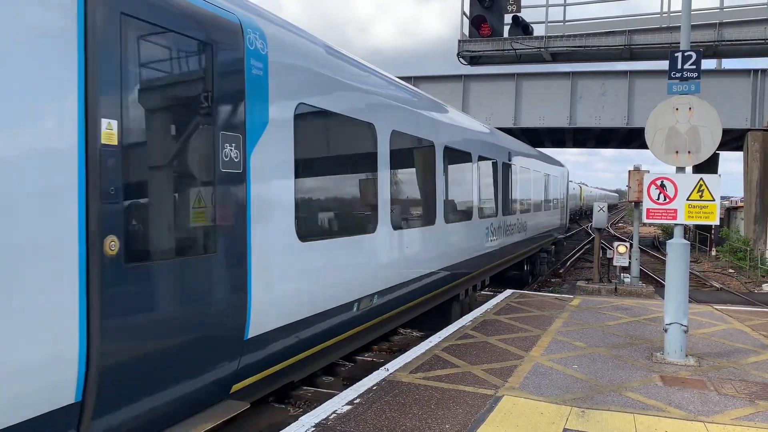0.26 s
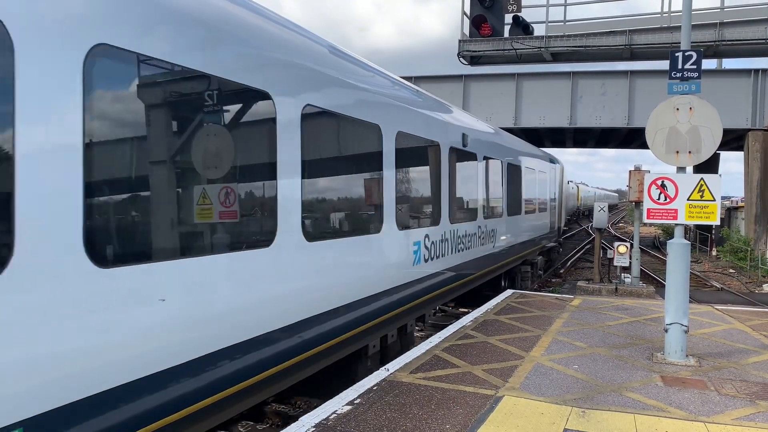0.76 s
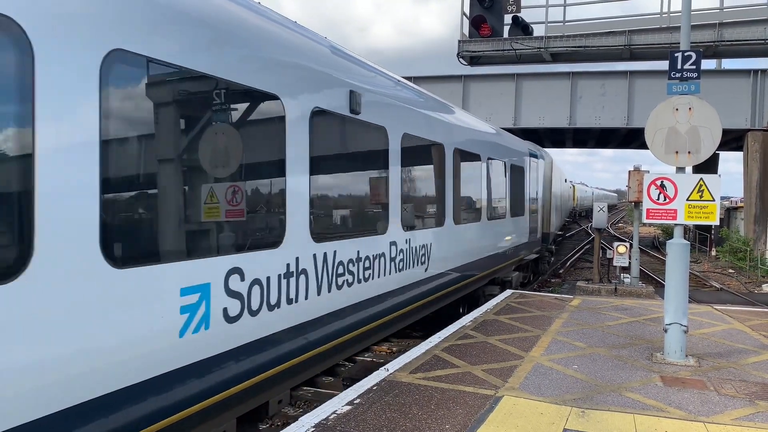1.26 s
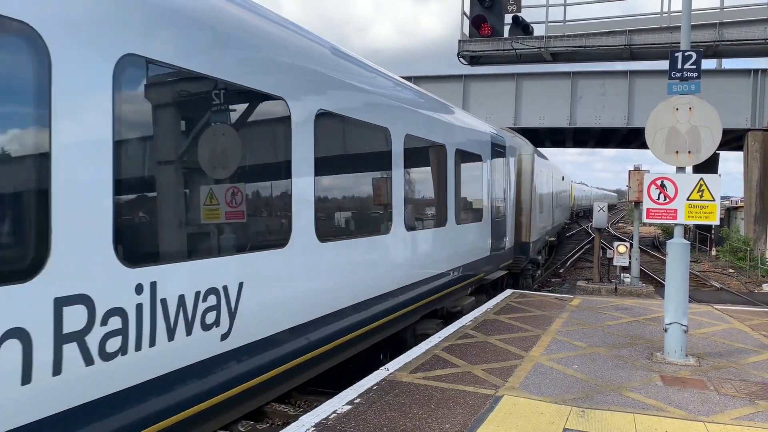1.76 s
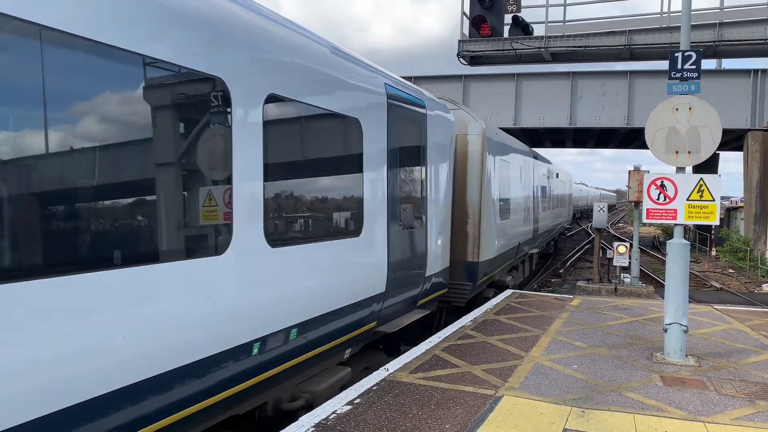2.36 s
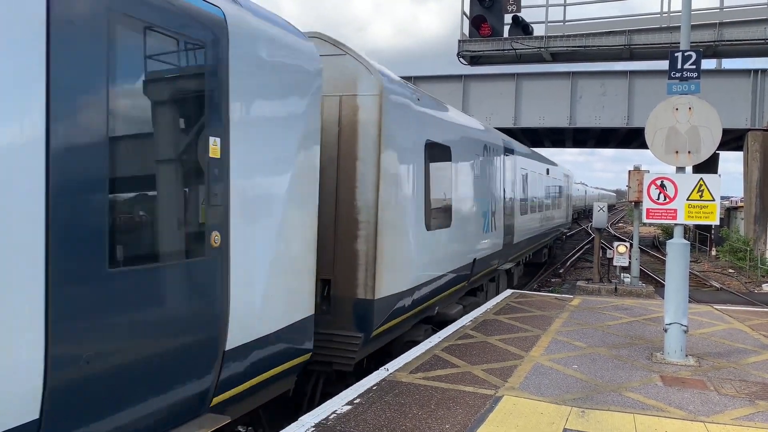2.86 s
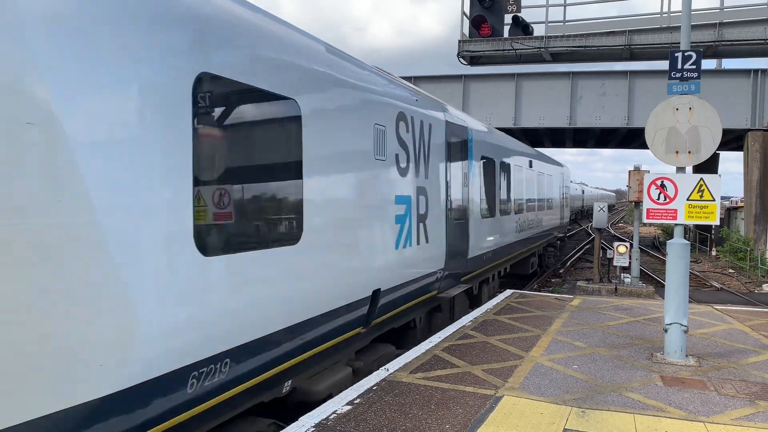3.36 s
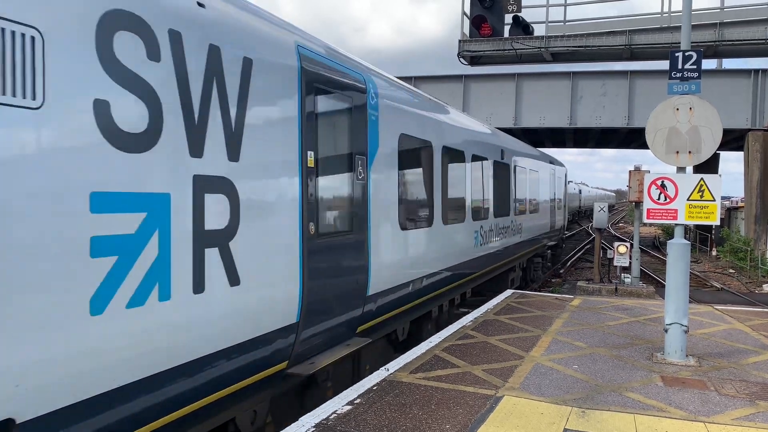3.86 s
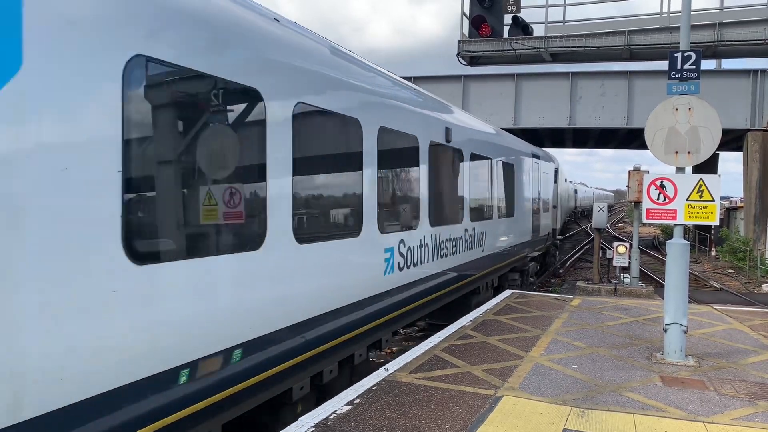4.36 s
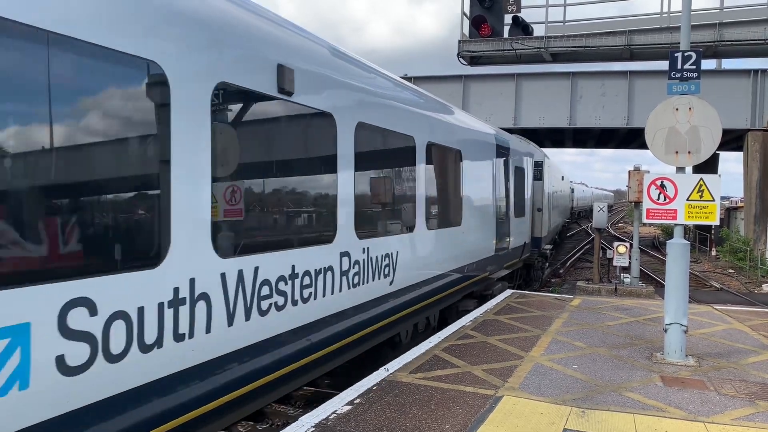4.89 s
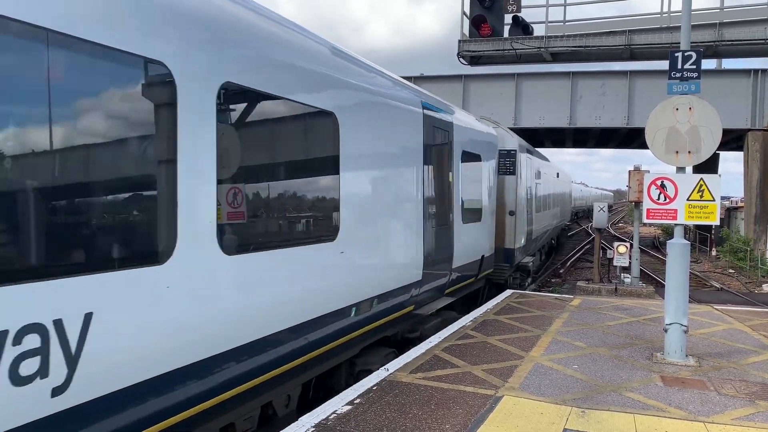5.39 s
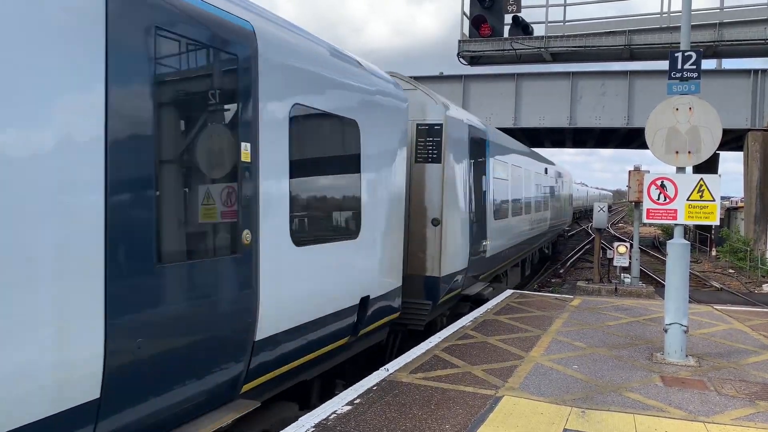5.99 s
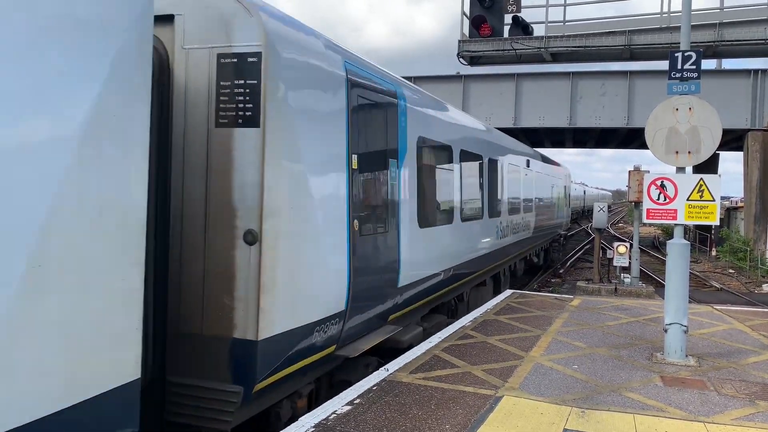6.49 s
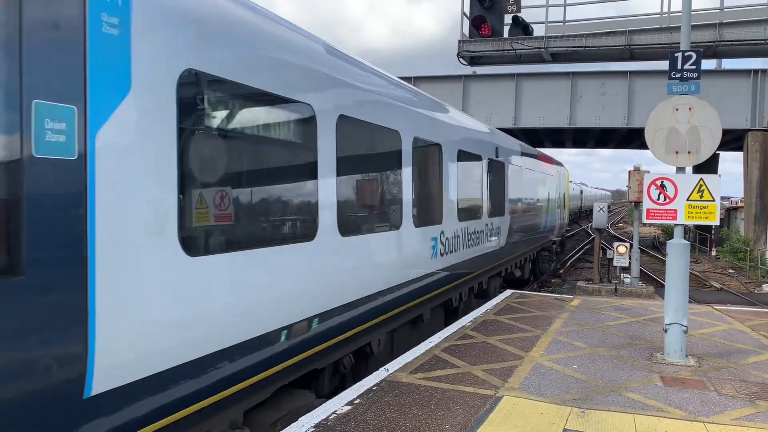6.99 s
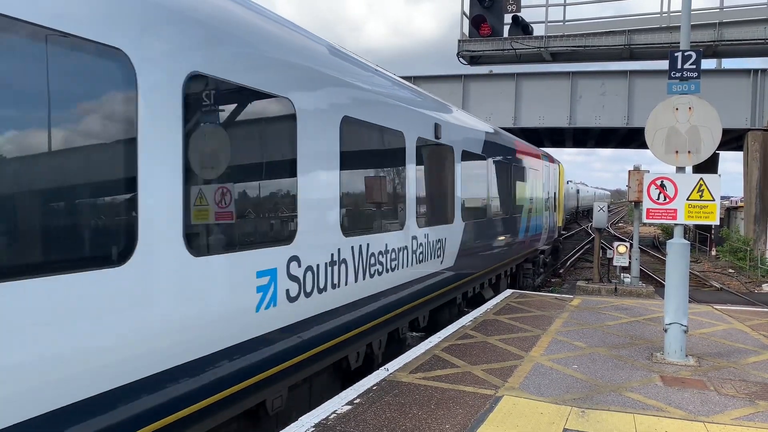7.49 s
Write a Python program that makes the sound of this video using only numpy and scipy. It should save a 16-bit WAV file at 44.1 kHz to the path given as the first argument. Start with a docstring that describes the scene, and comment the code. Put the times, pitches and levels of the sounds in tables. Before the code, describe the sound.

An electric train is already rolling past a platform, close to a stereo microphone outdoors. Low uneven rumble, hollow body drone and soft rail noise run throughout. From 0 to 1.2 s, dull muffled knocks from farther joints come irregularly, with light hiss and a thin squeak near 0.75. Heavy wheel blows on the near joint land at 1.36, 1.73, 2.39 and 2.78 s: a short thick crack, low thud, then a bright broken clank and brief ring. From 3 to 4.6 s mostly rumble remains, with airy hiss swelling around 3.9. A dull knock at 4.7 leads into blows at 4.75, 5.13, 5.79 and 6.17 s, with a small mid-pitched squeak around 5.3. From about 6 s, a wavering low electric hum and midrange roar rise with the approaching motor car, rail noise and hiss growing until the abrupt end at 7.7 s.

```python
"""Beside a railway platform, an electric train rolls along. Eight wheels in turn strike a rail joint close by:
the blow runs along the rail, its upper middle first, then the treble, the bass last; joint and wheel clank
and ring, built from noise bursts and struck tones. Shaped noise makes the rolling rumble, the hiss from the
underframe and the roar of a motor car, whose hum swells as it comes near. Metal squeaks, and dull knocks come
from joints further off. Two microphone ports a hand apart listen."""
import sys
import numpy as np
from scipy import signal
from scipy.fft import rfft, irfft, next_fast_len
from scipy.io import wavfile
from scipy.ndimage import uniform_filter1d, map_coordinates

SR = 44100
rng = np.random.default_rng(int(sys.argv[2]) if len(sys.argv) > 2 else 0)


def to_wav(sig):
    """Store sig (one row per channel, or 1-D mono) as 16-bit WAV at the path in sys.argv[1].

    Samples outside -1..1 are clipped; the rate is SR.
    """
    pcm = np.clip(np.atleast_2d(sig), -1, 1) * 32767
    pcm = np.round(pcm).astype(np.int16)
    wavfile.write(sys.argv[1], SR, pcm.T)  # frames by channels


N = 341334
T = np.arange(N) / SR  # time of every sample (s)


def amp(db):
    """Gain of a level in dB."""
    return 10 ** (np.asarray(db) / 20)


def unit(x):
    """x scaled to rms 1."""
    return x / np.sqrt(np.mean(x ** 2) + 1e-20)


def along(points, hz):
    """Every column after the first, read on a log-frequency axis."""
    f, *cols = np.transpose(points)
    return np.squeeze([np.interp(np.log(hz + 1), np.log(f + 1), c) for c in cols])


def curves(rows):
    """One value per sample for each column after the time."""
    s, *cols = np.transpose(rows)
    return [np.interp(T, s, c) for c in cols]


def wobble(rate):
    """A smooth random curve with rate random points a second."""
    points = rng.standard_normal(int(N * rate / SR) + 4)
    return map_coordinates(points, [T * rate])


def filtered(x, response):
    """x times a complex response of frequency."""
    m = next_fast_len(N + SR // 4)
    spectrum = rfft(x, m) * response(np.fft.rfftfreq(m, 1 / SR))
    return irfft(spectrum, m)[..., :N]


def smooth_noise(shape, bins, frames):
    """Random values averaged over neighbouring frequency bins and time frames."""
    across_bins = uniform_filter1d(rng.standard_normal(shape), size=bins, axis=0)
    return uniform_filter1d(across_bins, size=frames, axis=1)


def rush(spectrum, patchy_db):
    """Two unrelated noises of rms 1 with the same patches of random gain."""
    z = signal.stft(rng.standard_normal((2, N)), nperseg=512)[2]
    patches = unit(smooth_noise(z.shape[1:], bins=5, frames=10))
    pair = signal.istft(z * amp(patchy_db * patches), nperseg=512)[1][:, :N]
    return unit(filtered(pair, lambda hz: amp(along(spectrum, hz))))


def narrow(centre_hz, width_hz):
    """Two noises of rms 1 through one resonance applied twice."""
    peak = lambda f: 1 / (1 + ((f - centre_hz) / width_hz * 2) ** 2)
    return unit(filtered(rng.standard_normal((2, N)), peak))


def burst(bands, bend=1, uneven_db=3, grain_db=0):
    """Two noises whose bands arrive, swell and die in their own time; peak near 1. Bend over 1 holds, then drops."""
    noise = rng.standard_normal((2, SR // 2))
    hz, t, z = signal.stft(noise, SR, nperseg=256, noverlap=224)
    db, arrival, rise, t60 = along(bands, hz)[:, :, None]
    age = np.maximum(t - arrival, 0)
    uneven = unit(smooth_noise(z.shape[1:], bins=1, frames=60))  # no two blows alike
    rattle = unit(smooth_noise(z.shape[1:], bins=40, frames=4))  # many small impacts
    decay_db = -60 * (age / t60) ** bend
    swell = (1 - np.exp(-age / rise)) ** 1.5
    gain = amp(db + decay_db + uneven_db * uneven + grain_db * rattle) * swell
    pair = signal.istft(z * gain, SR, nperseg=256, noverlap=224)[1]
    loudest = np.sqrt(uniform_filter1d(pair[0] ** 2, size=SR // 25).max())
    return pair / (2.5 * loudest)


def ring(hz, t60):
    """One struck mode; its phase wanders and its strength flutters, so it sounds broken, not glassy."""
    t = np.arange(SR // 2) / SR
    wander = np.cumsum(rng.normal(0, 0.1, (2, len(t))), axis=1)
    flutter_db = 4 * map_coordinates(rng.standard_normal(60), [t * 70])
    fade = amp(flutter_db - 60 * t / t60) * (1 - np.exp(-t / 0.012))
    return fade * np.sin(2 * np.pi * hz * t + wander)


def add(track, s, sound):
    """Adds sound to track from second s on."""
    part = track[:, round(s * SR):][:, :sound.shape[1]]
    part += sound[:, :part.shape[1]]


def passing(at_s, distance_m):
    """Gain of a point on the train that is abreast at at_s; 1 at that moment."""
    speed = 23 / 3.397  # m/s: one car length per car time
    return 1 / np.hypot(1, speed * (T - at_s) / distance_m)


# how much the two ports hear the same: f/Hz, likeness (0-1)
PORT_LIKENESS = [(60, 0.73), (130, 0.94), (250, 0.91), (600, 0.45), (1500, 0.77), (2600, 0.21),
                 (4000, 0.11), (6500, 0.07), (8300, 1), (16000, 0.9)]
TREBLE_LAG = 8 / SR  # s


def ports(pair, lag, alike=PORT_LIKENESS):
    """Mixes a direct and a diffuse signal onto two ports; the left hears lag seconds after the right."""
    turn = lambda hz: np.arccos(np.clip(along(alike, hz), 0, 1)) / 2
    mid, side = filtered(pair, lambda hz: np.array([np.cos(turn(hz)), np.sin(turn(hz))]))
    delay = lambda hz: np.exp(np.outer([-1j, 1j], np.pi * hz * lag))
    return filtered(np.array([mid + side, mid - side]), delay)


# bands of the crack in the rail: f/Hz, level/dB, arrival t/s, rise t/s, fall by 60 dB t/s
CRACK_BANDS = [(149, -8, 0.011, 0.0099, .13), (300, 2.5, 0.013, .014, 0.13),
               (428, 0, 0.0039, 0.0094, 0.086), (660, -6.5, 0.0011, 0.014, 0.17),
               (1150, -13, 0.00083, 0.012, 0.14), (1590, -16, .001, 0.013, 0.17),
               (2130, -14.5, 0.00028, 0.011, 0.16), (3100, -26.5, 0.006, .016, 0.17),
               (5050, -33, 0.0062, 0.011, .2), (7660, -41, 0.0056, 0.0053, 0.066)]


def rail_crack(bite_db):
    """The rail's bending wave: a noise burst, upper middle first, treble a little later, bass last."""
    # the bite shifts the level above 1400 Hz
    bands = [(hz, db + bite_db * (hz > 1400), *times) for hz, db, *times in CRACK_BANDS]
    return burst(bands, bend=1.54, uneven_db=2.0, grain_db=2.5)


def landing():
    """The wheel landing on the far rail head: one sharp low push, ringing for two cycles; peak near 1."""
    pitch_hz, t60 = 287, 0.0093
    t = np.arange(SR // 20) / SR
    fade = amp(-60 * t / t60) * (1 - np.exp(-t / 0.00049))
    wave = -fade * np.sin(2 * np.pi * pitch_hz * t)
    return np.array([wave, .2 * wave])


def thud(hz):
    """A few cycles of the sleepers' bounce, sinking in pitch towards hz; peak near 1."""
    t = np.arange(SR // 5) / SR
    sinking_time = t + 0.0044 * (1 - np.exp(-t / 0.0047))
    wave = -t / 0.0073 * np.exp(1 - t / 0.006) * np.sin(2 * np.pi * hz * sinking_time)
    diffuse = 0.17 * np.gradient(wave) * SR / (2 * np.pi * hz)
    return np.array([wave, diffuse])


# wheel rim modes, each struck a little differently: f/Hz, level/dB, fall by 60 dB t/s
RIM_MODES = [(3994, -17, .25), (4673, -18, .2), (5612, -14, .25), (6298, -15, .3), (6530, -5, .22),
             (6625, -5, .15), (6742, -6, .17), (7617, -13, .22), (7714, -14, .22), (8037, -15, .25),
             (10160, -13, .25), (10900, -25, .25), (11320, -19, .28)]


def wheel_rim(top_db):
    """The rim's struck modes ring together; those above 10500 Hz are shifted by top_db."""
    total = 0
    for hz, mode_db, t60 in RIM_MODES:
        strength_db = mode_db + top_db * (hz > 10500) + rng.normal(0, 2.5)
        total = total + amp(strength_db) * ring(hz, t60)
    return total


# resonances of rail and fishplates: f/Hz, width f/Hz, level/dB
PLATE_RESONANCES = [(278, 140, -43), (448.7, 17, 15), (465, 46, -7), (740, 55, -12), (1224, 30, 3),
                    (1850, 63, -29), (2510, 120, -17), (3800, 180, -31)]


def plates(f):
    """Response of the jarred rail and fishplates: resonances in parallel, with alternating sign."""
    total = 0
    for k, (centre, width, db) in enumerate(PLATE_RESONANCES):
        resonance = 1j * f * width / (centre ** 2 - f ** 2 + 1j * f * width)
        total = total + (-1) ** k * amp(db) * resonance
    return total


# wheels on the joint: t/s, crack level/dB; levels against the crack: bite level/dB, thump level/dB,
# clank level/dB, wheel web level/dB, second clank level/dB; then thump f/Hz, thud delay t/s, clank delay t/s,
# rim level/dB against its clank, top rim modes level/dB against the rest, main blow delay t/s,
# blow level/dB against the crack
WHEEL_BLOWS = [(1.356, -5.5, -0.5, -4, -18, -24, -23.5, 148, .019, .001, 6, 3, .017, 3),
               (1.731, -7, 0.5, -1, -16, -23, -42, 129, .03, 0.0023, 4, 8, .017, 9),
               (2.394, -10, 3, -0.5, -15, -13.5, -19, 95, .041, 0.0045, -5, -3, .016, 11),
               (2.775, -11.5, 1.5, 6.5, -15, -34, -25, 115, .014, 0.0022, -3.5, -2, 0.012, 4.5),
               (4.753, -7, -2, -7, -15, -21, -34, 109, .038, 0.0027, 4.5, 2, .0175, 4),
               (5.128, -8.5, 1, 4, -17.5, -24, -22, 112, .021, .0038, -1, 3, 0.0166, 2),
               (5.792, -8.5, -2, 2, -17, -16, -26.5, 115, .032, .0071, 3, -6, .013, 1),
               (6.168, -9.5, 0.5, 6.5, -16, -25, -20.5, 109, .016, .003, -1, 6, .012, 0)]
# noise bands of the sleepers' thump, of the joint's clank, and of the thin hiss that runs ahead of the clank:
# f/Hz, level/dB, arrival t/s, rise t/s, fall by 60 dB t/s
THUMP_BANDS = [(30, -9, 0.021, 0.013, .3), (70, -2, .035, .012, .25), (133, 36, 0.032, 0.0054, 0.22),
               (245, -11, 0.04, 0.0082, 0.083), (500, -48, 0.038, 0.016, 0.053)]
CLANK_BANDS = [(2500, -41, .028, .004, .16), (4940, -7.5, 0.011, .004, 0.24),
               (7300, 5.5, 0.016, 0.0025, 0.27), (8700, -5.5, 0.027, 0.0032, 0.16),
               (10300, -1.5, 0.016, 0.0033, 0.31), (12700, -9, 0.016, .004, 0.25),
               (13700, 2, .022, .004, 0.16), (14700, -8, 0.019, 0.0024, 0.098),
               (16100, -8, 0.017, .003, 0.063)]
LEAD_BANDS = [(4970, -2, 0.0028, 0.0025, 0.18), (8650, 11, 0.0015, 0.0015, 0.016),
              (10800, 7, 0.0014, 0.0015, 0.16), (16000, -23, 0.002, 0.0022, 0.086)]
# how much the two ports hear the same blow: f/Hz, likeness (0-1)
BLOW_LIKENESS = [(60, 0.98), (130, 1), (300, .97), (550, 0.78), (900, 0.82), (1700, 0.15), (3500, .3),
                 (6500, 0.68), (11000, 0.62), (16000, 1)]


def joint():
    """Each wheel sends a wave down the rail, jars the plates, lands, thumps, clanks, rings and clanks once more."""
    second_clank_s, rebound_s, rebound_db = .03, 0.0072, -4.5
    direct_hz = 605  # above it the blow is heard from the left, below it all round
    rail, jars, thump, clank = np.zeros((4, 2, N))
    for (s, db, bite_db, thump_db, clank_db, web_db, second_db, thump_hz, thud_delay, clank_delay,
         rim_db, top_db, blow_delay, blow_db) in WHEEL_BLOWS:
        start = s - .011  # the wave swells for a moment before it is loud
        add(rail, start, amp(db) * rail_crack(bite_db))
        # the wheel lands, then lands a second time
        add(thump, s + blow_delay, amp(db + blow_db) * landing())
        add(thump, s + blow_delay + rebound_s, amp(db + blow_db + rebound_db) * landing())
        # the sleepers rumble below their thud
        add(thump, start, amp(db + thump_db - 9) * burst(THUMP_BANDS))
        add(thump, s + thud_delay, amp(db + thump_db) * thud(thump_hz))
        add(rail, start + 0.03, amp(db + web_db) * ring(3195, 0.2))  # wheel web: Hz, s
        add(clank, start, amp(db + clank_db - 10.0) * burst(LEAD_BANDS))
        for after in .004, .012, .021, .03, .038, .05:  # loose parts strike one after another
            strike = amp(db + 24 - 290 * abs(after - .021)) * rng.normal(0, 1, (2, 1))
            add(jars, s + after + rng.normal(0, 0.001635), strike)
        for after, level_db in (clank_delay, clank_db), (clank_delay + second_clank_s, second_db):
            add(clank, start + after + .02, amp(db + level_db + rim_db) * wheel_rim(top_db))
            add(clank, start + after, amp(db + level_db) * burst(CLANK_BANDS, bend=1.25, grain_db=1.5))
    blow = rail + filtered(jars, plates)
    low = filtered(blow, lambda hz: 1 / (1 + (hz / direct_hz) ** 4))
    from_left = ports(blow - low, -12 / SR, BLOW_LIKENESS)
    all_round = ports(low + thump, -3 / SR, BLOW_LIKENESS)
    return from_left + all_round + ports(clank, TREBLE_LAG, BLOW_LIKENESS)


# rumble: t/s, level/dB, change of its deepest bass level/dB
RUMBLE_LEVELS = [(0, -18, -23), (.25, -29.5, 3), (.56, -17.5, -1), (.66, -28.5, -8), (.9, -25.5, -6),
                 (1.15, -22, -5), (1.8, -22.5, 5), (2.2, -28, 9), (2.9, -21, -4), (3.5, -23, -3),
                 (3.88, -23.5, 7), (4.0, -26.5, 1), (4.35, -28, -2), (4.8, -21, 3), (5.25, -21.5, 3),
                 (5.45, -30.5, 2), (5.65, -28.5, 13), (5.9, -25, 10), (6.35, -23.5, -16), (6.65, -26, -13),
                 (7.05, -21, -5), (7.74, -20.5, -21)]
# rise and fall, each column shifted to a set mean: t/s, car body drone level/dB, rail noise level/dB
DRONE_LEVELS = [(0.0, -36.5, -43), (0.21, -33, -42.5), (0.52, -44.5, -43.5), (0.75, -38, -44.5),
                (1.29, -38, -44.5), (1.7, -40, -46), (1.89, -38.5, -44), (2.24, -39, -45),
                (2.82, -36.5, -43), (3.17, -37, -44), (3.62, -36, -42.5), (4.05, -39.5, -42.5),
                (4.5, -37.5, -43), (5.2, -39.5, -42.5), (5.33, -37, -43.5), (5.52, -39, -44),
                (5.8, -36.5, -43), (6.59, -38, -40.5), (6.98, -37, -39.5), (7.74, -32, -33.5)]
# relative noise spectra of rumble, car bodies and rolling rail: f/Hz, level/dB
RUMBLE_SPECTRUM = [(15, -41), (25, -82), (45, -2.5), (81, -1.5), (102, -2), (150, -9), (200, -11),
                   (260, -18.5), (440, -120)]
BODY_SPECTRUM = [(82, -1.5), (140, -0.5), (204, 3), (308, -4), (431, -7.5), (503, -8), (538, -18.5),
                 (700, -49), (910, -50), (1540, -120)]
RAIL_SPECTRUM = [(320, -37), (550, -1), (840, -0.5), (1100, -4), (1500, -5.5), (2050, -10.5), (2400, -12),
                 (2600, -11.5), (3400, -15.5), (3700, -17), (5500, -22), (6800, -21), (7800, -29),
                 (9800, -117), (16500, -120)]
# resonances of the car bodies, and of rail and wheel as they roll,
# against the broad noise of each: f/Hz, width f/Hz, level/dB
BODY_RESONANCES = [(352, 47, -29.5), (414, 81, -10), (553, 24, -20)]
RAIL_RESONANCES = [(796, 39, -17.5), (1086, 66, -14.5), (1967, 340, -13), (2270, 89, -16.5),
                   (3360, 40, -25)]
# rolling heard from the left: t/s, share of the power (0-1)
LEFT_SHARE = [(0, 0.73), (.45, 1), (1.2, 0.61), (2.6, 0.6), (3.7, 0.83), (4.7, 0.88), (5.3, 0.66),
              (6.6, 0.46), (7.74, 0.04)]


def rolling():
    """Wheel on rail: rumble, car body and rail noise, partly from the cars on the left, partly from ahead."""
    deep_hz, body_mean_db, rail_mean_db = 60.4, -31, -39
    rumble_db, deep_db = curves(RUMBLE_LEVELS)
    body_db, rail_db = curves(DRONE_LEVELS)
    body_gain = amp(body_mean_db + body_db - body_db.mean())
    rail_gain = amp(rail_mean_db + rail_db - rail_db.mean())
    lumps = wobble(9)  # uneven track shakes all three together

    def deepen(x):
        """Raises or lowers the deepest bass over time."""
        deep = filtered(x, lambda hz: 1 / (1 + (hz / deep_hz) ** 6))
        return x + (amp(deep_db) - 1) * deep

    def rings(table):
        """Narrow noises at the resonances, each wavering in level."""
        return sum(amp(db + 3.0 * wobble(5)) * narrow(hz, width) for hz, width, db in table)

    def one_side():
        """Fresh rumble, body and rail noise for one direction."""
        rumble = amp(rumble_db + 0.35 * lumps) * deepen(rush(RUMBLE_SPECTRUM, patchy_db=2.5))
        body = rush(BODY_SPECTRUM, patchy_db=2.5) + rings(BODY_RESONANCES)
        body = body_gain * amp(0.64 * lumps + 1.2 * wobble(22)) * body
        rail = rush(RAIL_SPECTRUM, patchy_db=2.25) + rings(RAIL_RESONANCES)
        return rumble + body + rail_gain * amp(0.16 * lumps) * rail

    left = np.clip(curves(LEFT_SHARE)[0], 0, 1)
    from_left = np.sqrt(left) * ports(one_side(), -14 / SR)
    from_ahead = np.sqrt(1 - left) * ports(one_side(), .1 / SR)
    return from_left + from_ahead


# the hum swells and wavers: t/s, low tone level/dB, high tone level/dB
HUM_LEVELS = [(5.7, -34, -55), (5.83, -29, -30), (5.9, -53, -52), (5.92, -40, -71), (5.97, -30, -44),
              (6.01, -23, -66), (6.2, -34, -34), (6.28, -30, -49), (6.68, -31, -37), (6.74, -24.5, -54),
              (6.92, -42.5, -50), (7.02, -27.5, -33.5), (7.1, -24, -68), (7.15, -26.5, -46),
              (7.19, -32, -62), (7.23, -22, -43.5), (7.67, -28.5, -34.5), (7.74, -20, -42)]
# relative spectrum of the roar: f/Hz, level/dB
ROAR_SPECTRUM = [(500, -33), (800, -29), (1200, 10), (1600, 4), (2300, 7.5), (2650, -6), (4000, -18),
                 (7000, -60)]
# how much the two ports hear the same motor car or squeak: f/Hz, likeness (0-1)
MOTOR_LIKENESS = [(200, 0.98), (500, 1), (1500, 0.62), (4000, 0.59)]


def motor():
    """Two wavering tones and a band of roar that rise out of the rumble with the motor car."""
    abreast_s, distance_m, roar_db = 8.7, 2.54, -31.5  # roar level is for the moment abreast
    roar_beam = 0.93  # growth against a point source
    heard_from_s, fade_in_s = 5.87, 0.42
    tones = 0
    for hz, db in zip((193.2, 503), curves(HUM_LEVELS)):
        level = np.sqrt(2) * amp(db + 2.8 * wobble(16))
        wander = np.cumsum(rng.normal(0, 0.0038, (2, N)), axis=1)  # rad, one random step per sample
        tones = tones + level * np.sin(2 * np.pi * hz * T + wander)
    nearness = passing(abreast_s, distance_m) ** roar_beam
    roar = amp(roar_db) * nearness * rush(ROAR_SPECTRUM, patchy_db=-3.9)
    fade_in = np.clip((T - heard_from_s) / fade_in_s, 0, 1)
    return ports(fade_in * (tones + roar), .1 / SR, MOTOR_LIKENESS)


# hissing units under the cars: abreast t/s, level/dB, distance (m)
HISS_UNITS = [(.45, -47, 3), (3.9, -43.5, 2.3), (5.28, -61, 2), (7.8, -42.5, 5.7)]
# puffs of treble, the strong ones as a bogie nears the joint: t/s, length t/s, level/dB
TREBLE_PUFFS = [(0.903, .05, -49), (1.058, 0.059, -54), (1.233, 0.14, -39.5), (2.279, 0.12, -42),
                (4.3, 0.029, -47), (4.637, .11, -41), (5.652, 0.17, -43.5)]
# relative spectrum of the hiss: f/Hz, level/dB
HISS_SPECTRUM = [(4000, 0.5), (6000, -2), (8500, 6), (10000, 3.5), (12300, -7), (13400, 6.5), (14800, -20),
                 (16000, 4)]


def hiss():
    """Treble noise from under the cars: units that swell and fade almost evenly as they pass by, and puffs."""
    floor_db = -59.5  # between units
    beam_before, beam_after = 3.07, 3.2  # fall against a point source, before and after abreast
    gain = amp(floor_db)
    for s, db, distance_m in HISS_UNITS:
        beam = np.where(T < s, beam_before, beam_after)
        gain = gain + amp(db) * passing(s, distance_m) ** beam
    gain = gain * amp(0.44 * wobble(9.5))
    for s, length, db in TREBLE_PUFFS:
        gain = gain + amp(db) * np.sin(np.pi * np.clip((T - s) / length, 0, 1))
    return ports(gain * rush(HISS_SPECTRUM, patchy_db=1.5), TREBLE_LAG)


# squeaks: t/s, length t/s, first f/Hz, last f/Hz, width f/Hz, level/dB
METAL_SQUEAKS = [(.735, .17, 3730, 3730, 260, -48.5), (0.735, .16, 4280, 4280, 300, -49),
                 (1.18, 0.11, 4170, 4170, 400, -52), (4.9, .06, 4400, 4300, 200, -52),
                 (4.91, .2, 3800, 3700, 170, -52.5), (5.17, 0.37, 1100, 1085, 35, -43),
                 (7.08, 0.2, 4500, 4330, 60, -52), (4.17, 0.29, 3430, 3440, 30, -57),
                 (3.9, .12, 3280, 3380, 80, -58)]


def squeaks():
    """Short rough tones of rubbing metal that swell and fade, some of them gliding in pitch."""
    steady_below_hz = 60  # squeaks narrower than this are mostly a steady tone
    out = np.zeros((2, N))
    for s, length, first_hz, last_hz, width, db in METAL_SQUEAKS:
        share = np.clip((T - s) / length, 0, 1)
        swell = np.sin(np.pi * share)
        a, b = narrow(0, width)
        noise = a + 1j * b
        rough = steady_below_hz / width + np.array([noise, noise[::-1]])
        turns = np.cumsum(first_hz + (last_hz - first_hz) * share) / SR
        tone = swell * np.real(rough * np.exp(2j * np.pi * turns))
        out = out + amp(db) * tone * np.linalg.norm(swell) / np.linalg.norm(tone[0])
    return ports(out, -10 / SR, MOTOR_LIKENESS)


# duller knocks from joints further off: t/s, level/dB, edge level/dB against the knock
FAR_KNOCKS = [(.063, -23, -14), (.222, -17, -13), (0.152, -18, -13), (0.279, -16.5, -11),
              (0.326, -13.5, -30), (0.465, -23, -25), (0.52, -17.5, -12), (0.577, -23, -33),
              (0.779, -17.5, -34), (0.994, -23.5, -6.5), (1.059, -22.5, -29), (1.208, -13, -13),
              (2.917, -30, -17), (3.119, -34, -22), (4.204, -37, -28), (4.686, -15.5, -9),
              (5.707, -20, -15), (6.041, -32, -12), (6.382, -35, -11)]
# noise bands of a knock and of its sharper edge: f/Hz, level/dB, arrival t/s, rise t/s, fall by 60 dB t/s
KNOCK_BANDS = [(60, -13, .008, .008, 0.15), (147, 8, 0.013, 0.0054, 0.27), (340, 5, 0.0014, 0.0016, 0.078),
               (700, -29, 0.0008, 0.0078, 0.063), (2000, -64, .001, 0.0056, 0.045)]
EDGE_BANDS = [(250, -14, .004, .002, 0.074), (500, -1, 0.0069, 0.0026, 0.15),
              (900, -16, 0.0051, 0.0024, 0.093), (2500, -37, 0.0059, .002, .04)]


def knocks():
    """Short dull blows from afar: a low noise burst, a sharper edge and a snap near the start."""
    snap_db = 11  # against the edge
    far = np.zeros((2, N))
    for s, db, edge_db in FAR_KNOCKS:
        add(far, s - .004, amp(db) * (burst(KNOCK_BANDS) + amp(edge_db) * burst(EDGE_BANDS)))
        add(far, s + 0.0028, amp(db + edge_db + snap_db) * landing())
    return ports(far, -10 / SR)


def scene():
    """Everything at the two ports."""
    return joint() + rolling() + motor() + hiss() + squeaks() + knocks()


def record(dry):
    """The microphones lose the deepest bass, the loudest peaks are rounded, nothing passes above the band limit."""
    top_hz = 15870
    x = filtered(dry, lambda hz: 1 / (1 + (36 / (hz + 1)) ** 4))
    x = x / (1 + np.abs(x / .95) ** 6) ** (1 / 6)
    return filtered(x, lambda hz: hz < top_hz)


dry = scene()
out = record(dry)
to_wav(out)
```